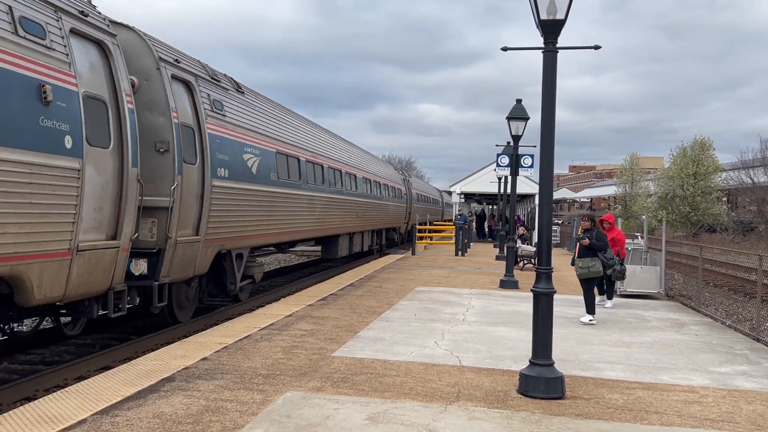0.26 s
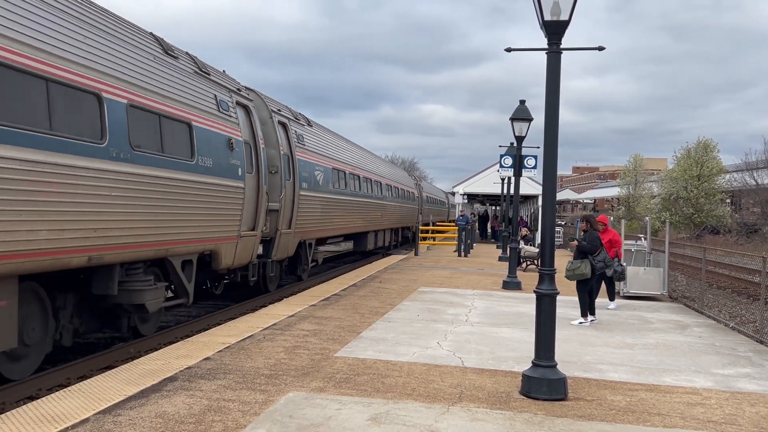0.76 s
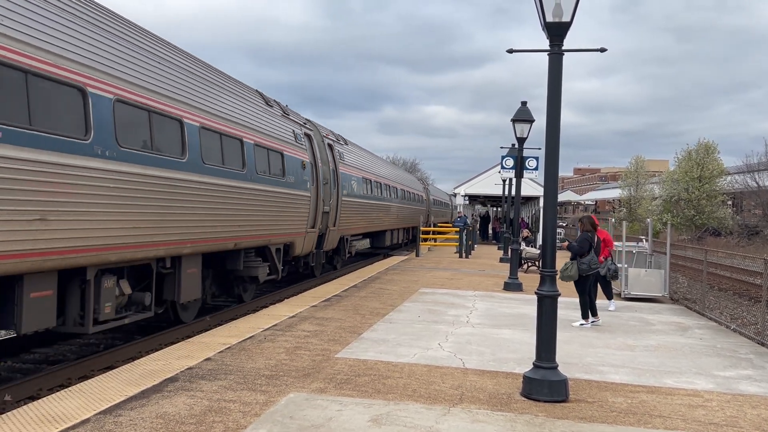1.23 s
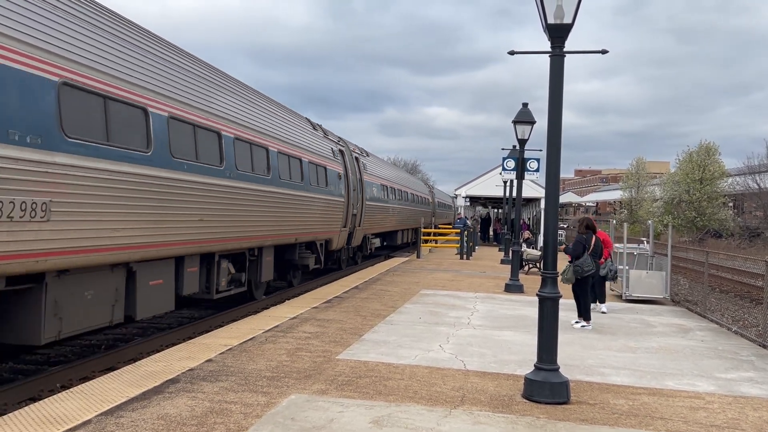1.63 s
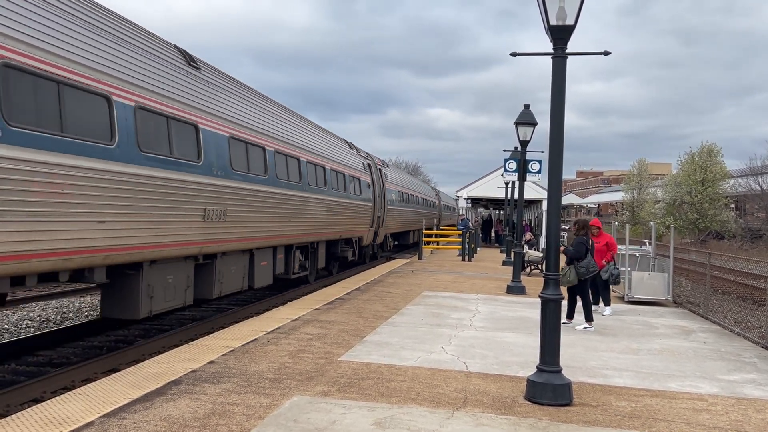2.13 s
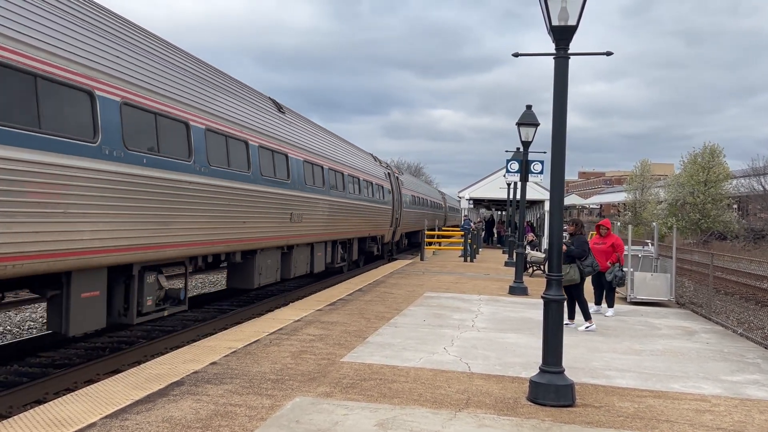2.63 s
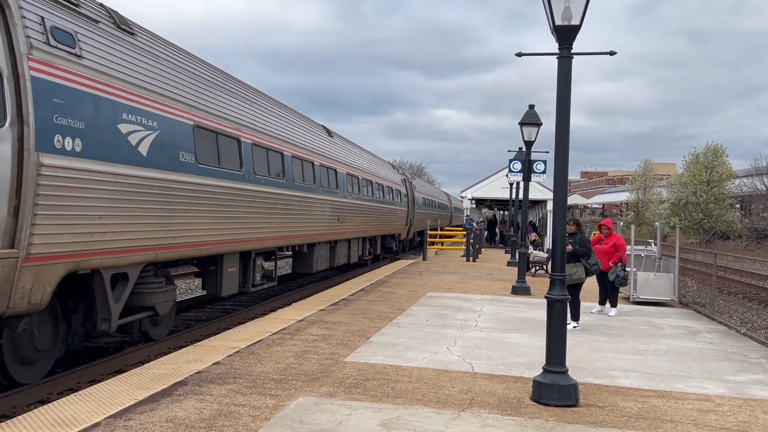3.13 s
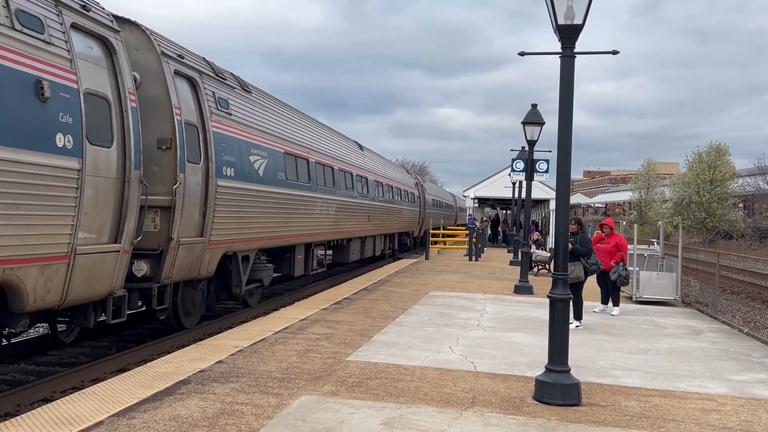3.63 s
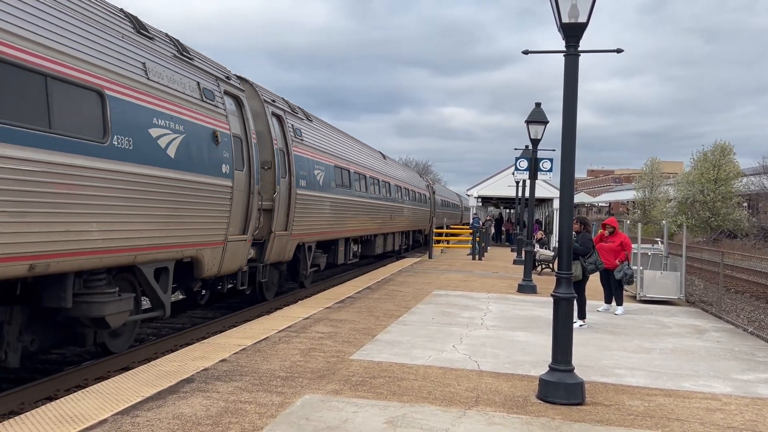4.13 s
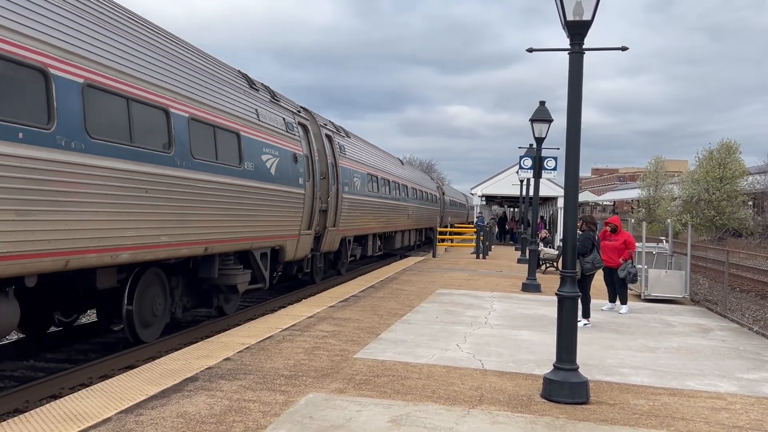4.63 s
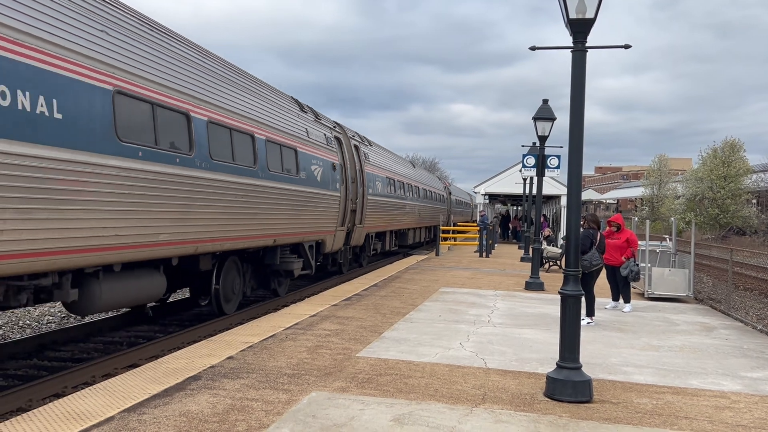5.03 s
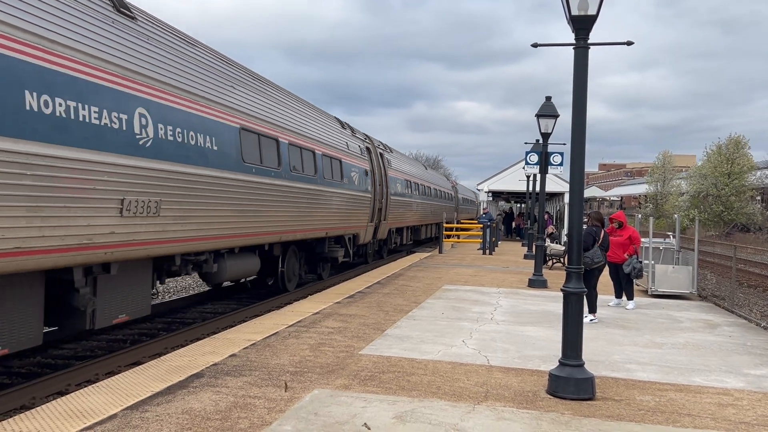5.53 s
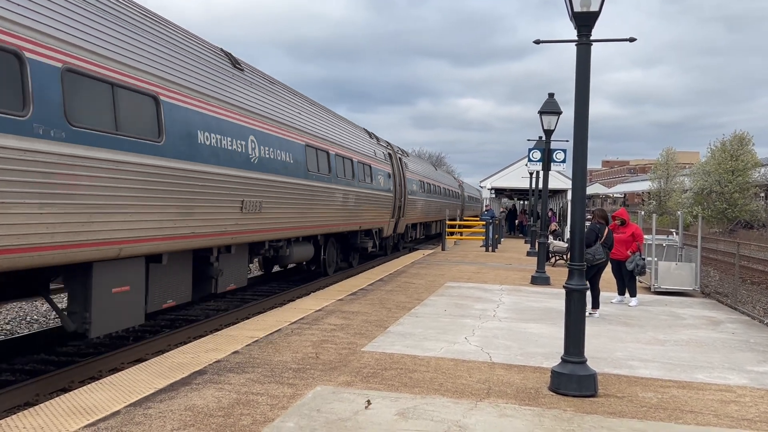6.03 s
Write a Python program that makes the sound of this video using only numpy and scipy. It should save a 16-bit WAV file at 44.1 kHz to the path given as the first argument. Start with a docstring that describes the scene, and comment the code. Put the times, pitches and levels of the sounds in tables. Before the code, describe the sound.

Passenger coaches roll past a station platform with the brakes on, heard close by in stereo on a phone. From the start there is a low rumble, a wavering brake drone and light metallic scraping, with a thin whine that fades by about 1.6 seconds. A very high, faint squeal stutters on until about 4 seconds. Wheels thump over joints near 0.9 seconds, then more heavily from 1.5 to 3.2, where the rumble, drone and ringing scrape are loudest, peaking around 2 seconds. Loose brake gear clicks now and then through the first four seconds. At about 4.2 seconds brake air hisses out with a burst of squeaks, holds until 5.1 and dies away by 6. Short high chirps repeat through the hiss, and another run of softer wheel knocks comes around 5 seconds. The quieter rolling and rubbing continue to the end at 6.3 seconds.

```python
"""A station platform: passenger coaches roll past with the brakes on, heard by two phone microphone ports.
Rails and floors rumble under the load, the brake discs drone and squeal, and the rubbing pads scrape,
chirp and keep the wheels ringing. Wheels thump over joints and flats, loose brake gear clicks,
and brake air hisses out once. A thin whine fades away behind it all."""
import sys
import numpy as np
from scipy import signal
from scipy.fft import rfft, irfft, next_fast_len
from scipy.io import wavfile
from scipy.ndimage import uniform_filter1d, map_coordinates

SR = 44100
rng = np.random.default_rng(int(sys.argv[2]) if len(sys.argv) > 2 else 0)


def dump(signal):
    """Clip the signal to [-1, 1] and save it as 16-bit WAV at the path in sys.argv[1]."""
    limited = np.clip(np.atleast_2d(signal).T, -1, 1)
    pcm = np.round(limited * 32767).astype(np.int16)
    wavfile.write(sys.argv[1], SR, pcm)


N = 276948


def amp(db):
    """Decibels to gain."""
    return 10 ** (np.asarray(db) / 20)


def unit(x):
    """Scale to rms 1."""
    return x / np.sqrt(np.mean(np.abs(x) ** 2) + 1e-20)


def along(points, hz):
    """Read (f/Hz, value) points at hz on a log axis."""
    f, values = np.transpose(points)
    return np.interp(np.log(hz + 1), np.log(f + 1), values)


def colour(spectrum):
    """An EQ curve through (f/Hz, level/dB) points."""
    return lambda hz: amp(along(spectrum, hz))


def curves(rows):
    """One envelope for each column after the time."""
    times, *columns = np.transpose(rows)
    return [np.interp(np.arange(N) / SR, times, column) for column in columns]


def ramp(start_s, rise_s):
    """0 before the start, then a straight rise to 1."""
    return np.clip((np.arange(N) / SR - start_s) / rise_s, 0, 1)


def wobble(per_s):
    """A smooth random curve with per_s knots a second."""
    return map_coordinates(rng.standard_normal(200), [np.arange(N) * per_s / SR])


def filtered(x, response):
    """Filter x by a complex response of frequency."""
    size = next_fast_len(x.shape[-1] + 8192)
    hz = np.fft.rfftfreq(size, 1 / SR)
    return irfft(rfft(x, size) * response(hz), size)[..., :x.shape[-1]]


def rush(eq, patchy_db):
    """Two unrelated noises (direct and scattered path) of one colour, with patches of random gain."""
    spectra = signal.stft(rng.standard_normal((2, N)), nperseg=512)[2]
    patches = uniform_filter1d(rng.standard_normal(spectra.shape[1:]), size=10, axis=0)
    patches = unit(uniform_filter1d(patches, size=12, axis=1))
    noise = signal.istft(spectra * amp(patchy_db * patches), nperseg=512)[1][:, :N]
    return unit(filtered(noise, eq))


def fuzzy(hz, spread_hz, steady=0, n=N):
    """A blurred tone on both paths: strength and phase wander around a steady part."""
    drift = unit(filtered(rng.standard_normal((2, 2, n)), lambda f: 1 / (1 + (f / spread_hz) ** 4)))
    drift[0, 0] += steady  # the steady part takes the direct path
    phase = 2 * np.pi * np.cumsum(np.broadcast_to(hz, n)) / SR
    return unit(drift[0] * np.cos(phase) + drift[1] * np.sin(phase))


def rolling():
    """Rails, floors and bogies shake under the load; four noise bands heave partly together."""
    # rumble envelope: t/s, level/dB
    rumble_level = [(0.0, -43), (0.03, -28), (0.12, -32), (0.87, -30.5), (0.93, -18), (0.99, -28),
                    (1.22, -27.5), (1.36, -22.5), (1.64, -30.5), (1.68, -24), (1.73, -34), (1.8, -17),
                    (1.84, -21), (1.91, -22), (1.97, -24), (2.15, -18.5), (2.2, -28), (2.27, -22.5),
                    (2.48, -30), (2.53, -44), (2.62, -36.5), (3.02, -40), (3.09, -45), (3.13, -32),
                    (3.2, -36), (3.25, -30.5), (3.44, -34), (3.92, -28.5), (4.13, -34), (4.22, -31),
                    (4.23, -35), (4.42, -38), (4.53, -42), (4.58, -31), (4.81, -40.5), (5.09, -32),
                    (5.11, -41), (5.16, -31), (5.21, -41), (5.58, -33), (5.61, -42), (5.81, -32),
                    (5.89, -36.5), (6.28, -41.5)]
    # envelopes of the next two bands: t/s, body/dB, roar/dB
    roar_level = [(0.0, -35, -42), (0.61, -38, -41.5), (1.14, -35, -40), (1.43, -30.5, -38.5),
                  (1.8, -34, -35.5), (1.99, -27.5, -34), (2.24, -28, -34), (2.43, -28, -38.5),
                  (2.92, -39.5, -42.5), (3.31, -32, -41.5), (3.57, -36.5, -41), (3.88, -35.5, -43.5),
                  (4.16, -34, -43), (4.65, -38, -41), (5.35, -43.5, -41), (6.28, -39, -41.5)]
    # colours of the bands, low to high: f/Hz, level/dB
    rumble_eq = [(20, -30), (30, -67), (45, -0.5), (80, 5), (120, 0), (170, -5), (300, -73)]
    body_eq = [(70, -10), (130, -5.5), (200, 0.5), (280, 0), (400, -5), (700, -50)]
    roar_eq = [(200, -60), (380, -7), (470, -4.5), (600, -13), (800, -10.5), (950, -25), (1200, -43),
               (2000, -93)]
    grind_eq = [(700, 4.5), (1200, 1), (1450, 8.5), (2000, -2.5), (2300, -4.5), (3200, -7), (5000, -27)]
    rumble_db, = curves(rumble_level)
    body_db, roar_db = curves(roar_level)
    grind_db = -38 + .94 * (roar_db - roar_db.mean())  # the grind rides the roar's swings
    heave = wobble(11)
    rumble = amp(rumble_db + .3 * heave + .5 * wobble(6)) * rush(colour(rumble_eq), patchy_db=.65)
    body = amp(body_db + .32 * heave + .5 * wobble(6)) * rush(colour(body_eq), patchy_db=1)
    roar = amp(roar_db + 1.2 * heave + .5 * wobble(6)) * rush(colour(roar_eq), patchy_db=1.5)
    grind = amp(grind_db + .5 * heave) * rush(colour(grind_eq), patchy_db=1.5)
    return rumble + body + roar + grind


def disc_drone():
    """The brake discs hum on pairs of blurred tones that take turns, each pair inside a breathy band."""
    # three close pairs of disc tones: f/Hz, spread/Hz, steady-to-noise ratio
    tones = [(333, 10, 3), (357, 12, 2), (690, 11, 2.5), (716, 11, 3), (1006, 16, 1.2), (1063, 20, 1.3)]
    # envelopes: t/s, low pair (2 x level/dB), middle pair (2 x level/dB), undertone/dB
    drone_levels = [(0.0, -54, -50, -54, -40.5, -55), (0.09, -46, -32, -52, -34, -53),
                    (0.17, -50, -40.5, -52, -39.5, -57), (0.31, -42.5, -35, -48, -41.5, -60),
                    (0.63, -44, -41.5, -49, -43, -59), (0.91, -39, -31.5, -44, -43.5, -57),
                    (0.94, -32, -34.5, -53, -47, -58), (1.01, -57, -35, -54, -38, -46),
                    (1.1, -34, -43, -46, -52, -42), (1.12, -36, -41, -55, -53, -61),
                    (1.22, -40, -33, -39, -35.5, -50), (1.28, -41, -54, -38, -37, -51),
                    (1.33, -38, -29, -41, -43, -52), (1.43, -31, -47, -41, -37, -48),
                    (1.52, -28.5, -24, -32, -26.5, -47), (1.55, -35, -35, -35, -34, -40),
                    (1.63, -31.5, -39, -27.5, -31, -32), (1.75, -30.5, -29, -31, -32, -50),
                    (1.82, -29, -38, -44, -43, -44), (1.94, -33.5, -32, -34, -27.5, -34),
                    (2.03, -30, -41, -32, -36, -32), (2.06, -35, -17.5, -30.5, -47, -38),
                    (2.17, -43, -48, -34, -32, -33), (2.27, -25.5, -37, -40, -38, -31.5),
                    (2.36, -25, -41, -25, -27, -26.5), (2.48, -24.5, -36, -34, -46, -34.5),
                    (2.69, -26.5, -26, -31, -30, -40), (2.83, -34, -27.5, -35.5, -39, -36.5),
                    (3.02, -40, -38.5, -37, -36, -39), (3.06, -31, -30, -32.5, -41, -38),
                    (3.27, -31.5, -32, -41.5, -41.5, -39), (3.43, -42, -38.5, -41.5, -41, -52),
                    (3.64, -33.5, -38, -42, -44, -52), (3.71, -31, -45, -40, -38, -38),
                    (3.93, -47, -41, -48, -40, -49), (4.04, -38, -32, -47, -43, -45),
                    (4.16, -38, -38.5, -37, -45, -42), (4.34, -32, -39, -40, -46, -44),
                    (4.46, -53, -35, -33.5, -35.5, -43), (4.49, -32, -33, -48, -41, -51),
                    (4.53, -46, -46, -46, -50, -43), (4.56, -33, -35, -45, -40.5, -38),
                    (4.69, -43, -47, -40, -38, -45), (4.76, -38, -32.5, -37.5, -49, -47),
                    (4.83, -38, -46, -44.5, -40, -46), (4.88, -41, -33.5, -42, -54, -55),
                    (5.04, -49, -41, -44, -39, -48), (5.18, -56, -54, -57, -50, -59),
                    (5.3, -43, -45, -42.5, -44, -40), (5.47, -43, -49, -44, -40, -50),
                    (5.51, -45, -39, -39, -41, -38), (5.58, -43, -44, -64, -58, -54),
                    (5.61, -37, -43, -46, -46, -47), (5.7, -47, -43, -50, -41, -53),
                    (5.84, -35, -39, -41.5, -51, -43), (5.91, -42, -45, -49, -59, -62.5),
                    (5.95, -41, -35, -42, -52, -51), (6.12, -31, -42, -46.5, -47, -41),
                    (6.17, -42, -49, -40, -39, -45), (6.28, -35, -38, -57, -49, -62)]
    # envelopes of the top pair: t/s, lower tone/dB, upper tone/dB
    top_levels = [(0.0, -59, -50), (0.07, -61, -57), (1.28, -70, -52), (1.45, -56, -38.5), (1.59, -52, -46),
                  (1.7, -50, -43), (1.94, -47, -50), (2.01, -42, -44), (2.06, -51, -52), (2.08, -40, -35.5),
                  (2.2, -51, -45), (2.26, -41, -46), (2.38, -45, -42), (2.41, -49, -51), (2.48, -48, -40.5),
                  (3.13, -46, -44.5), (3.36, -54, -50), (3.48, -53, -39), (3.51, -61, -53),
                  (3.71, -58, -50), (3.74, -46, -52), (3.83, -61, -55), (4.3, -55.5, -47.5),
                  (5.67, -55, -59), (5.86, -47, -48), (6.0, -59, -55), (6.03, -49, -53), (6.14, -63, -59),
                  (6.23, -50, -51), (6.28, -59, -55)]
    # breathy band around each pair: f/Hz, spread/Hz, level against the pair/dB
    halos = [(344, 33, -16.5), (703, 36, -6.5), (1047, 50, -1.5)]
    *tones_db, undertone_db = curves(drone_levels)
    gains = amp(tones_db + curves(top_levels))
    out = np.zeros((2, N))
    for (hz, spread_hz, steady), gain in zip(tones, gains):
        waver = amp(.7 * wobble(7))
        out += gain * waver * fuzzy(hz + 4 * wobble(5), spread_hz, steady)
    out += amp(undertone_db) * fuzzy(668 + 3 * wobble(5), spread_hz=13, steady=1.5)
    for (hz, spread_hz, db), lower, upper in zip(halos, gains[::2], gains[1::2]):
        out += amp(db) * np.hypot(lower, upper) * fuzzy(hz, spread_hz)
    return out


def wheel_thumps():
    """A wheel meets a joint or lands on its flat: a short push with a dying thud, knock and clack."""
    # wheel blows: t/s, level/dB, push/Hz, knock trim/dB, clack trim/dB
    blows = [(0.855, -20, 336, -11, -27), (0.918, -19, 100, -32, -25), (0.939, -14.5, 188, -31, -30),
             (1.45, -16, 320, -10, -11), (1.529, -16, 108, -5, -24), (1.794, -13, 94.5, -21, -27),
             (1.81, -9, 222, -28, -29), (1.889, -13.5, 95, -25, -31), (1.912, -15, 297, -4, -16),
             (2.001, -18, 110, -4, -17), (2.065, -4, 360, -16, -36), (2.089, -8.5, 109, -5, -17),
             (2.147, -14, 130, -15, -23), (2.227, -25, 70, -20, -25), (2.267, -16.5, 85, -15, -25),
             (2.272, -15, 339, -1.5, -15), (2.338, -12, 340, -9, -31), (2.418, -21, 334, -5, -11),
             (2.435, -24, 90, -20, -25), (2.649, -8.5, 312, -25, -38), (2.673, -14, 330, -15, -8.5),
             (2.681, -10.5, 296, -6.5, -23), (2.791, -12, 350, -17.5, -27), (2.913, -17, 330, -16, -14),
             (2.947, -21.5, 295, -19, -6), (3.062, -20.5, 400, -2.5, -19), (3.069, -15, 280, -4.5, -14),
             (3.199, -24, 320, 1, -19), (3.476, -20.5, 360, -5, -10.5), (3.9, -24, 202, -4.5, -6.5),
             (4.378, -18.5, 230, -6.5, -29), (4.557, -14.5, 334, -30, -19), (4.978, -18.5, 110, -26, -16),
             (5.017, -16.5, 240, -13, -21), (5.04, -17, 556, -2.5, -27), (5.05, -19.5, 175, -9, -29),
             (5.064, -18, 302, -7, -18), (5.072, -24, 75, -22, -25), (5.1, -21.5, 352, -7, -21),
             (5.118, -27, 302, 1.5, -21), (5.15, -19.5, 456, -7, -30), (5.16, -32, 94, -18, -25),
             (5.512, -24, 342, -12, -29), (5.535, -18, 300, -10, -16), (5.791, -20, 338, -20, -22)]
    out, t = np.zeros((2, N + SR)), np.arange(11000) / SR

    def band(low_hz, high_hz):
        noise = rng.standard_normal((2, len(t)))
        return unit(filtered(noise, lambda f: 1 / (1 + (low_hz / (f + 1)) ** 4) / (1 + (f / high_hz) ** 8)))

    def fade(t60_s, rise_s):
        return amp(-60 * t / t60_s) * (1 - np.exp(-t / rise_s))

    for start_s, db, push_hz, knock_db, clack_db in blows:
        push = 3.3 * np.sin(2 * np.pi * push_hz * t) * fade(5.5 / push_hz, .001)
        knock = amp(knock_db + 4.5) * band(360, 794) * fade(.095, .0025)
        thud = .84 * band(150, 434) * fade(.11, .0024)
        clack = amp(clack_db + 4.5) * band(1300, 1940) * fade(.09, .0025)
        blow = thud + knock + clack
        blow[0] += push  # direct path only
        out[:, round(start_s * SR):][:, :len(t)] += amp(db - 5.5) * blow
    return out[:, :N]


def wheel_ring(modes, pitch=1):
    """Friction noise rings through a set of wheel resonances."""
    def resonance(hz, centre_hz, width_hz):
        damping = (hz * width_hz) ** 2
        return damping / ((centre_hz ** 2 - hz ** 2) ** 2 + damping)

    def eq(hz):
        return sum(amp(db) * resonance(hz / pitch, centre, width) for centre, width, db in modes)

    return rush(eq, patchy_db=1.6)


def passing_ring(modes):
    """Doppler: a slightly sharp ring crossfades to its true pitch as the bogie passes."""
    passed = ramp(start_s=1.2, rise_s=1.1)
    return np.sqrt(1 - passed) * wheel_ring(modes, pitch=1.018) + np.sqrt(passed) * wheel_ring(modes)


def pad_rub():
    """Rubbing pads scrape broadly and keep the wheel modes ringing."""
    # pads on wheels: t/s, scrape/dB, low modes/dB, middle modes/dB
    rub_levels = [(0, -47.5, -48, -77), (.72, -48.5, -53, -57.5), (1.28, -48.5, -46, -54),
                  (1.55, -44.5, -47, -50), (1.66, -39, -41, -42.5), (1.8, -42.5, -46, -48.5),
                  (2.04, -36, -45, -43), (2.36, -36.5, -40.5, -46), (2.9, -40, -44.5, -46.5),
                  (3.25, -38.5, -44.5, -56), (3.55, -44.5, -52, -53.5), (3.76, -42, -44.5, -50),
                  (3.97, -42.5, -64, -56), (4.18, -42, -47.5, -48.5), (4.39, -37.5, -47, -47),
                  (4.74, -42, -50, -54), (4.97, -55, -57, -60), (5.02, -42, -48, -51),
                  (5.19, -52.5, -55, -74), (5.33, -42.5, -55, -51), (5.96, -44.5, -50, -54),
                  (6.28, -43.5, -49, -58)]
    # colour of the scrape: f/Hz, level/dB
    scrape_eq = [(1500, 1), (2500, 0), (4000, 1.5), (6000, -1), (7200, -3.5), (9500, -14), (12500, -6.5),
                 (15000, -13.5), (15600, -19)]
    # wheel modes in groups (low, middle, high, three lone ones): f/Hz, width/Hz, level/dB
    wheel_modes = [
        [(1400, 70, -6), (1720, 90, -2), (2000, 120, -3), (3930, 80, -10)],
        [(5330, 70, -9), (6180, 320, 0)],
        [(10750, 480, 0), (11800, 300, -9), (14470, 380, -5)],
        [(2850, 480, 0)],
        [(4490, 270, 0)],
        [(7970, 420, 0)],
    ]
    # envelope of the high modes: t/s, level/dB
    high_level = [(0.0, -71), (0.47, -71), (0.73, -59), (0.84, -64), (2.26, -38), (3.95, -53.5),
                  (4.42, -41.5), (4.97, -54), (4.98, -41), (5.25, -59), (5.28, -49), (6.28, -57)]
    # envelopes of the lone modes: t/s, 3 x level/dB
    lone_levels = [(0.0, -55, -62, -69), (0.14, -56, -56, -67), (0.58, -58, -59, -72),
                   (0.68, -53, -60, -58), (0.94, -65, -59, -66), (1.54, -63, -54.5, -53.5),
                   (1.63, -38, -52, -57), (1.71, -51, -51, -51), (1.96, -47, -44, -53),
                   (1.99, -36, -47, -48), (2.04, -43, -43, -44), (2.12, -39, -39, -48),
                   (2.13, -43, -37, -43), (2.33, -51, -43.5, -51), (2.38, -48, -49, -46),
                   (2.43, -50, -40, -47), (2.92, -49, -42, -51), (3.32, -53, -49, -50.5),
                   (3.57, -63, -53, -60), (3.62, -44, -50, -56), (3.65, -63, -49, -50),
                   (3.97, -57, -53, -65), (4.2, -58, -52, -57), (4.3, -60, -55, -48), (4.39, -49, -52, -47),
                   (4.49, -58, -52, -48), (4.98, -59, -54, -51), (5.51, -52, -55, -50),
                   (6.07, -55, -57, -55), (6.28, -52, -57, -64)]
    # envelope of one narrow wheel mode: t/s, level/dB
    thin_level = [(0.0, -38), (0.23, -66), (1.08, -52), (1.12, -65), (1.59, -48), (1.91, -57), (1.94, -33),
                  (2.04, -63), (2.15, -39), (2.22, -52), (3.25, -45), (3.29, -58), (4.2, -55), (4.34, -54),
                  (4.53, -53), (4.76, -48), (4.79, -60), (5.58, -45.5), (5.61, -40), (5.82, -53.5),
                  (5.96, -54), (6.28, -64)]
    scrape_db, low_db, middle_db = curves(rub_levels)
    grip_db = .37 * wobble(12)  # the pad force flutters as the wheel turns
    out = amp(scrape_db + grip_db) * rush(colour(scrape_eq), patchy_db=1.5)
    low, middle, high, *lone = wheel_modes
    rings = wheel_ring(low), wheel_ring(high), passing_ring(middle), *map(passing_ring, lone)
    rings_db = low_db, *curves(high_level), middle_db, *curves(lone_levels)
    for ring, db in zip(rings, rings_db):
        flicker_db = 1.3 * wobble(13)
        out += amp(db + grip_db + flicker_db) * ring
    return out + amp(*curves(thin_level)) * fuzzy(1700, spread_hz=20, steady=.9)


def pad_chirps():
    """Pads grab for a moment and sing on one blurred pitch; the thin whine also comes back briefly near 475 Hz
    at 4.6 s."""
    # squeaks, plus the whine's brief return (the 475 Hz row at 4.6 s): t/s, length/s, f/Hz, spread/Hz, level/dB
    squeaks = [(1.429, 0.35, 1750, 24, -40.5), (1.58, 0.23, 2930, 450, -43.5),
               (3.053, 0.061, 2010, 140, -38.5), (3.18, 0.17, 1840, 49, -41.5),
               (4.272, 0.22, 1545, 240, -34), (4.275, 0.11, 8280, 90, -42.5), (4.277, 0.25, 2690, 120, -51),
               (4.28, 0.26, 3910, 79, -45), (4.285, 0.18, 6200, 90, -55), (4.289, 0.2, 5330, 140, -47),
               (4.34, 0.11, 7900, 110, -47), (4.39, 0.062, 8300, 70, -47), (4.37, 0.069, 5310, 52, -42.5),
               (4.6, 0.23, 475, 8, -39), (4.457, 0.14, 6580, 200, -43.5), (4.662, 0.12, 6580, 170, -40),
               (4.985, 0.12, 6550, 170, -41.5), (5.281, 0.12, 6550, 170, -43),
               (5.4, 0.12, 6450, 170, -44.5), (5.566, 0.099, 6500, 200, -48), (6.108, 0.16, 436, 4.8, -37)]
    out, n = np.zeros((2, N + 2 * SR)), 18000
    for start_s, length_s, hz, spread_hz, db in squeaks:
        progress = np.arange(n) / SR / length_s
        swell = np.clip(5 * np.minimum(progress, 1 - progress), 0, 1)
        out[:, round(start_s * SR):][:, :n] += amp(db) * swell * fuzzy(hz, spread_hz, n=n)
    return out[:, :N]


def brake_air():
    """Brake air escapes: a quick rise, a hold, a sag and a fade; its top band swells later."""
    # colour of the hiss: f/Hz, level/dB
    hiss_eq = [(1500, -45), (3000, -4), (6500, -1), (9000, 0.5), (12400, -17), (14000, -12), (15600, -11)]
    # envelope of the top band: t/s, level/dB
    top_level = [(4.2, -72), (4.48, -41), (5.0, -43.5), (5.23, -50), (5.29, -45), (5.7, -58), (5.72, -70),
                 (6.01, -73), (6.07, -57), (6.28, -70)]
    t = np.arange(N) / SR
    open_s, sag_s, shut_s = 4.23, 5.1, 5.6  # the hiss dies faster once the valve shuts
    hiss_db = -41 - 9 * np.maximum(t - sag_s, 0) - 18 * np.maximum(t - shut_s, 0)
    top = rush(lambda hz: np.exp(-(np.log2((hz + 1) / 11840) / .3) ** 2), patchy_db=-1)
    flutter = amp(1.2 * wobble(14))
    hiss = amp(hiss_db) * rush(colour(hiss_eq), patchy_db=1)
    return ramp(open_s, rise_s=.055) * flutter * (hiss + amp(*curves(top_level)) * top)


def disc_squeal():
    """One disc mode whistles in stuttering spells; a neighbour and a breathy band lie around it."""
    # whistle spells: t/s, length/s, level/dB
    spells = [(-.2, 1.5, -50.5), (1.138, 0.8, -49), (1.78, 0.59, -56), (2.15, 0.7, -46.5),
              (2.65, 0.45, -50), (3.35, 0.75, -47.5)]
    edge_s = .17
    envelope = sum(amp(db) * ramp(start_s, edge_s) * (1 - ramp(start_s + length_s - edge_s, edge_s))
                   for start_s, length_s, db in spells)
    stutter_db = 2.5 * wobble(12)
    whistle = fuzzy(13165, spread_hz=18, steady=.7) + amp(-8) * fuzzy(13075, spread_hz=12)
    breath = fuzzy(13010, spread_hz=230) + amp(-7.5) * fuzzy(12300, spread_hz=1600)
    return envelope * (amp(stutter_db) * whistle + amp(.5 + .22 * stutter_db) * breath)


def gear_ticks():
    """Loose brake gear clicks: a short bright puff about an octave and a half wide."""
    # clicks: t/s, level/dB, t60/s, centre/Hz
    clicks = [(.08, -44, .03, 9000), (.248, -38.5, 0.05, 6000), (.655, -38, 0.037, 4500),
              (0.692, -40, 0.18, 8000), (1.602, -38, 0.071, 4000), (1.977, -35, 0.056, 3020),
              (3.62, -34, 0.071, 5940), (3.819, -34.5, 0.071, 4000), (3.917, -34, 0.047, 6300),
              (4.13, -32, 0.018, 4000), (4.221, -36, .04, 5000)]
    out, t = np.zeros((2, N + SR)), np.arange(5000) / SR
    for start_s, db, t60_s, centre_hz in clicks:
        noise = rng.standard_normal((2, len(t)))
        puff = filtered(noise, lambda hz: np.exp(-(np.log2((hz + 1) / centre_hz) / .92) ** 2))
        out[:, round(start_s * SR):][:, :len(t)] += amp(db - 60 * t / t60_s) * unit(puff)
    return out[:, :N]


def whine():
    """A thin tone, perhaps an underfloor fan, fades as its coach rolls away."""
    level_db = -45 - 13 * ramp(start_s=.85, rise_s=.8)
    return amp(level_db) * fuzzy(466, spread_hz=6, steady=1.6)


def scene():
    """Direct sound reaches both ports alike, scattered sound in antiphase; a phase offset parts them."""
    # stereo focus: f/Hz, share of sound common to both ports
    common = [(30, .97), (90, .84), (180, .44), (340, .7), (550, .45), (700, .68), (900, .5), (1060, .7),
              (1250, .5), (1500, .72), (1650, .55), (1950, .9), (2300, .68), (2750, .8), (3500, .6),
              (4500, .85), (5600, .58), (7000, .999), (7700, .8), (8000, .87), (8700, .68), (9600, .9999),
              (10300, .9999), (10700, .95), (11400, .66), (12500, .999), (13400, .995), (14000, .67),
              (14500, .88), (15000, .7), (15300, .999)]
    # phase between the ports: f/Hz, lead of the left/rad
    left_lead = [(20, 0), (170, -.4), (350, .6), (550, .1), (660, 1.3), (750, 1.5), (1100, 1.9),
                 (1350, 3.2), (1600, 3.9), (1720, 6.4), (3300, 7.2), (5000, 6.4), (5600, 5.2), (6400, 6.2),
                 (7500, 6.1), (7700, 5.6), (8900, 4.3), (9600, 3.14), (10300, 3.14), (10500, 2.6),
                 (12400, 0), (13500, -.1), (13900, -1), (15200, -3.1)]

    def path_gains(hz):
        angle = np.arccos(along(common, hz)) / 2
        return np.array([np.cos(angle), np.sin(angle)])

    paths = (rolling() + disc_drone() + whine() + pad_rub() + disc_squeal()
             + brake_air() + pad_chirps() + wheel_thumps() + gear_ticks())
    direct, scattered = filtered(paths, path_gains)
    ports = np.array([amp(.2) * (direct + scattered), amp(-.2) * (direct - scattered)])
    return filtered(ports, lambda hz: np.exp(.5j * along(left_lead, hz) * [[1], [-1]]))


def record(dry):
    """The phone loses the deepest bass and keeps nothing above its band limit."""
    low_cut_hz, top_hz = 36, 15700
    return filtered(dry, lambda hz: (hz < top_hz) / np.sqrt(1 + (low_cut_hz / (hz + 1)) ** 6))


dry = scene()
out = record(dry)
dump(out)
```